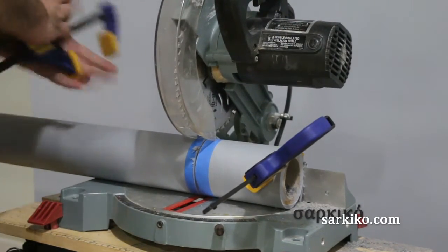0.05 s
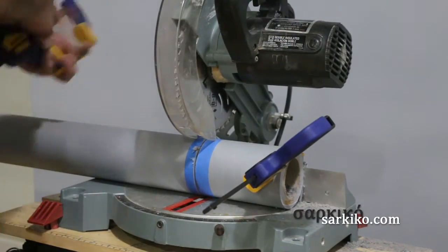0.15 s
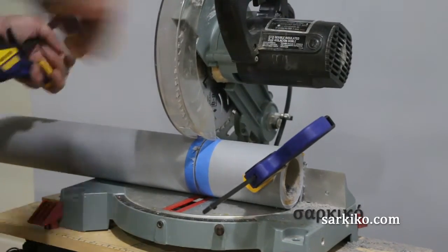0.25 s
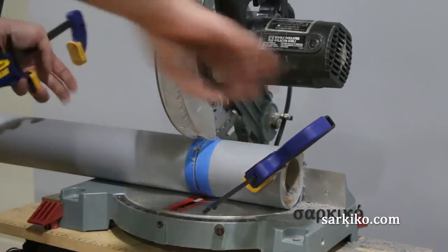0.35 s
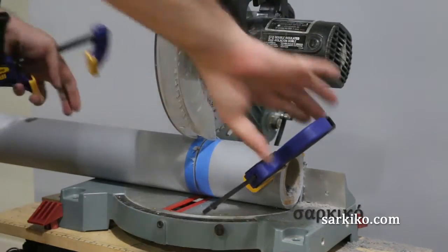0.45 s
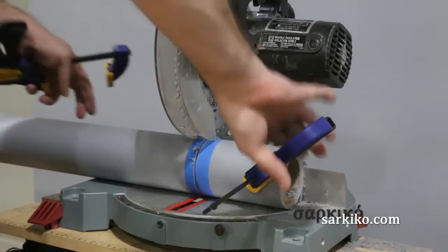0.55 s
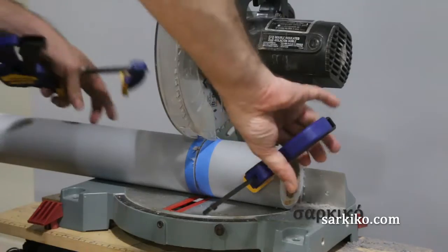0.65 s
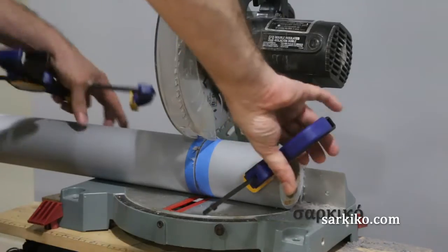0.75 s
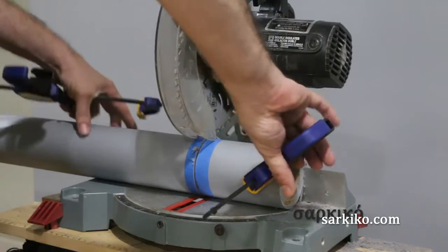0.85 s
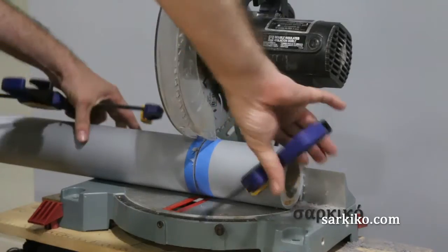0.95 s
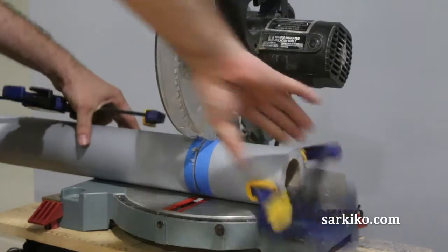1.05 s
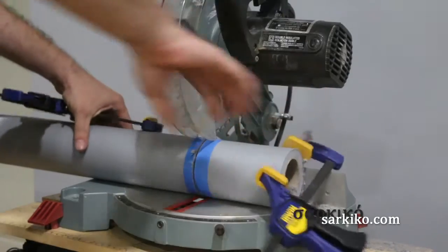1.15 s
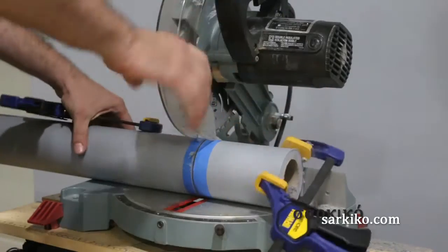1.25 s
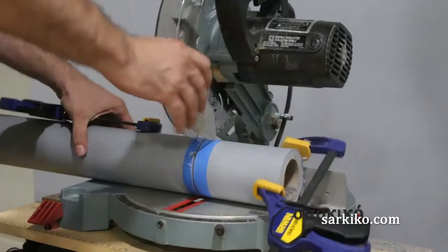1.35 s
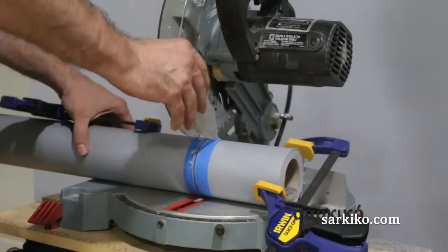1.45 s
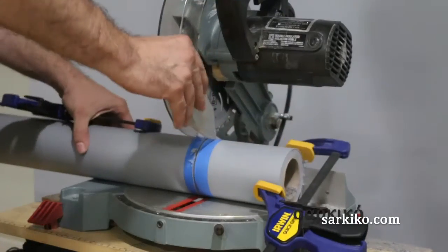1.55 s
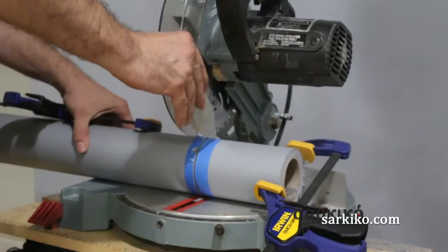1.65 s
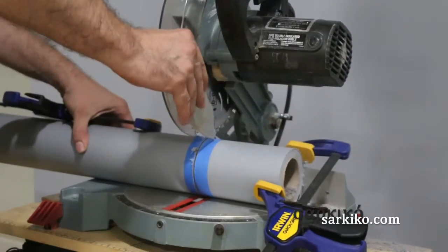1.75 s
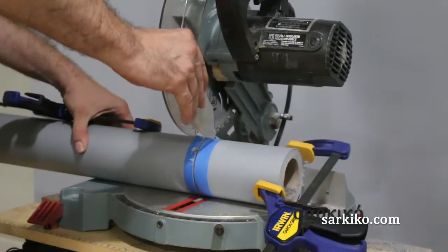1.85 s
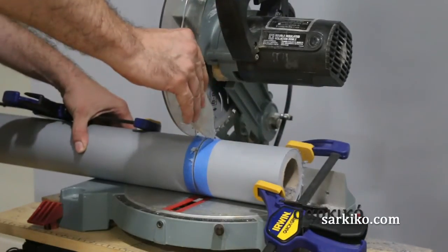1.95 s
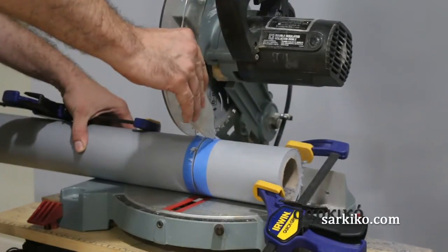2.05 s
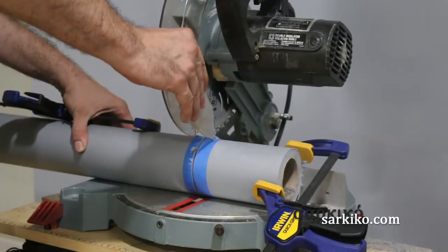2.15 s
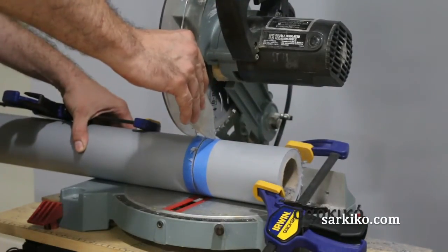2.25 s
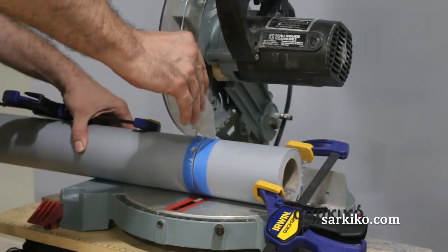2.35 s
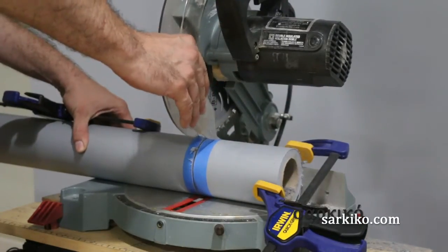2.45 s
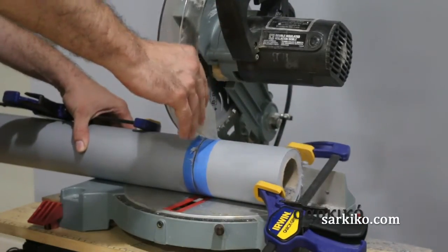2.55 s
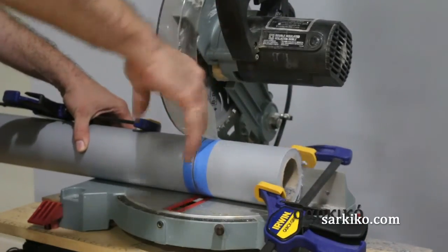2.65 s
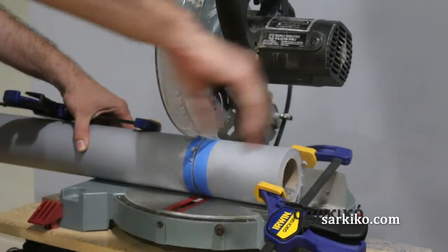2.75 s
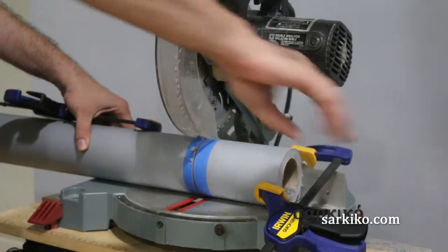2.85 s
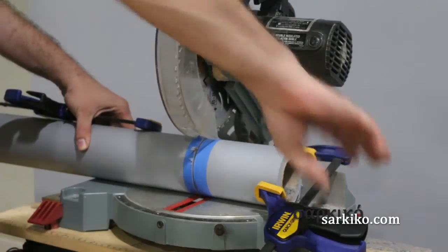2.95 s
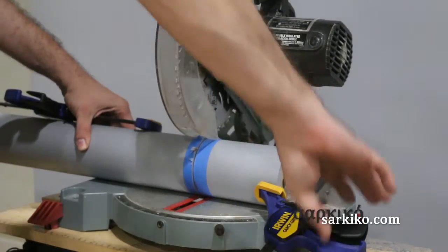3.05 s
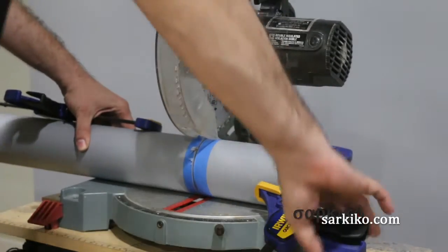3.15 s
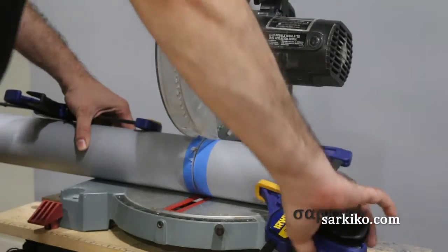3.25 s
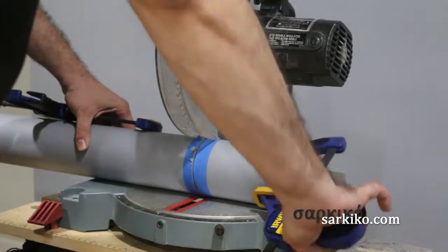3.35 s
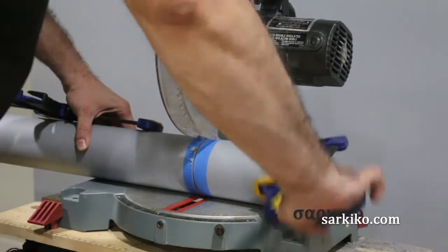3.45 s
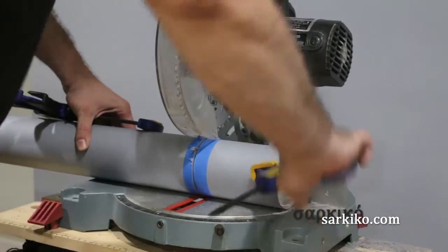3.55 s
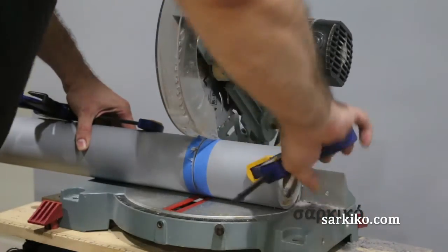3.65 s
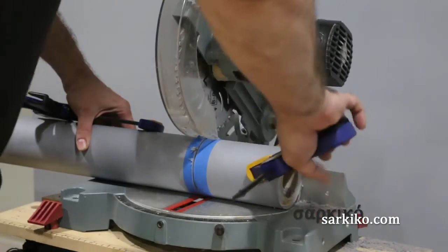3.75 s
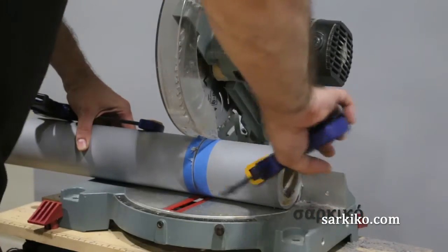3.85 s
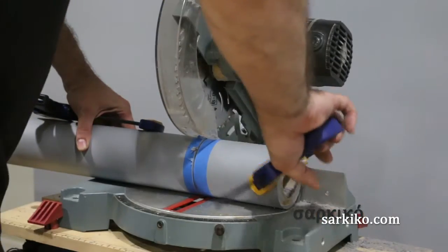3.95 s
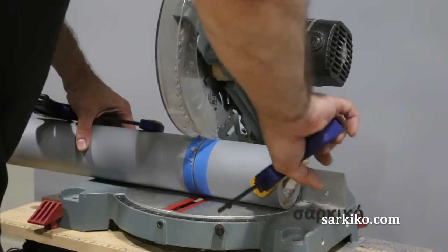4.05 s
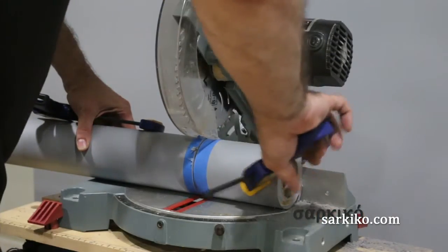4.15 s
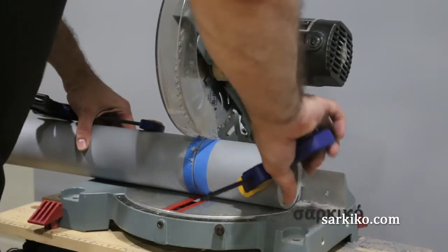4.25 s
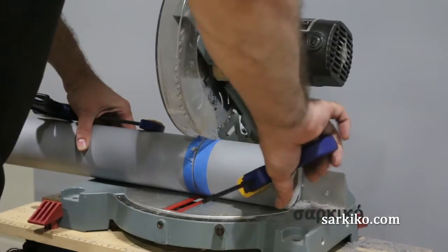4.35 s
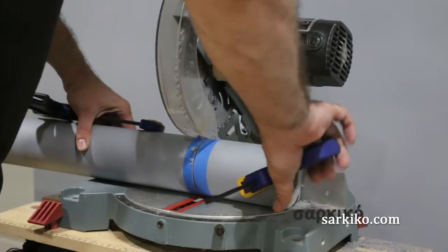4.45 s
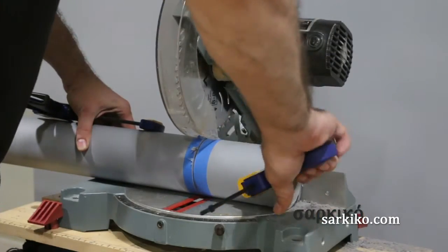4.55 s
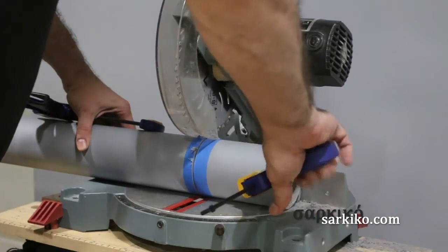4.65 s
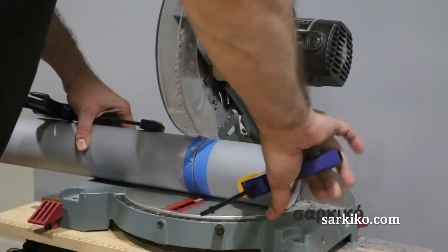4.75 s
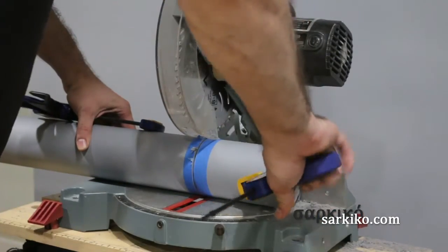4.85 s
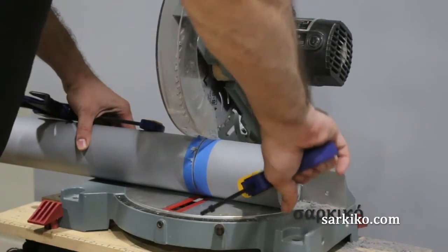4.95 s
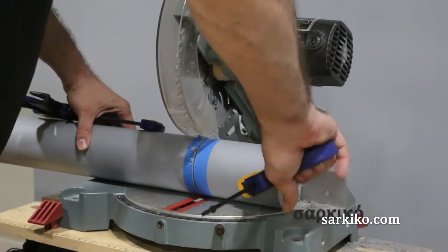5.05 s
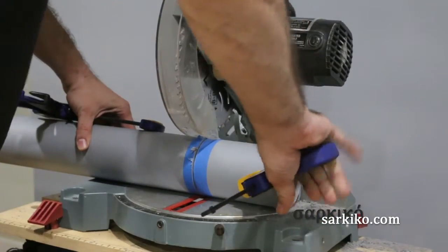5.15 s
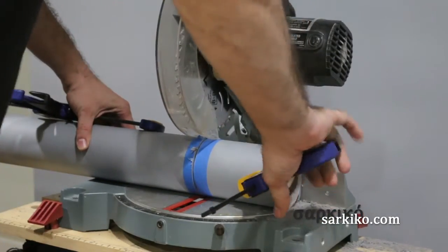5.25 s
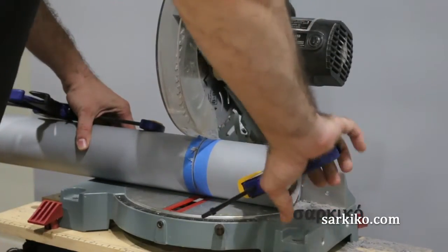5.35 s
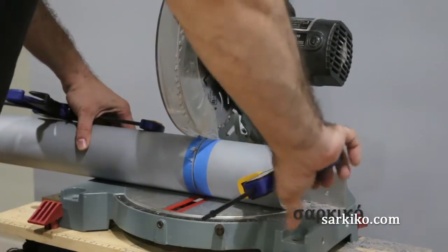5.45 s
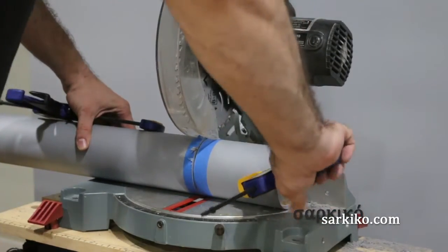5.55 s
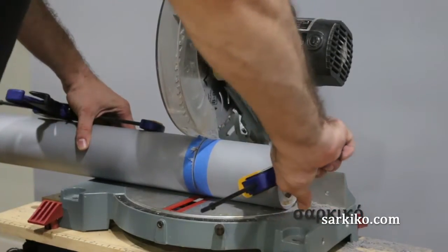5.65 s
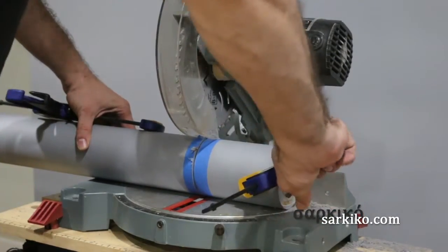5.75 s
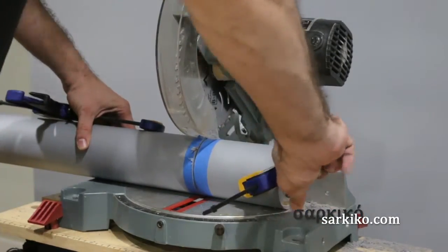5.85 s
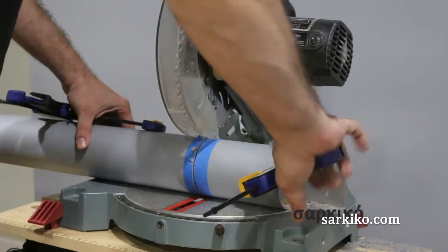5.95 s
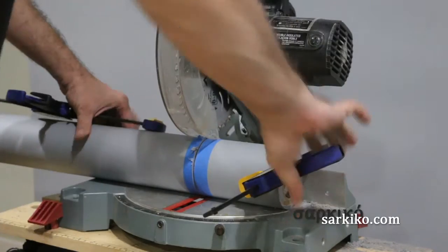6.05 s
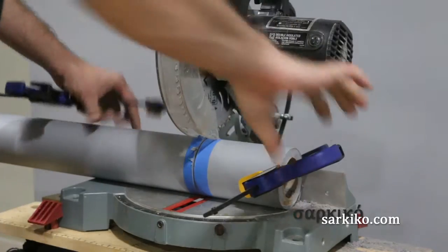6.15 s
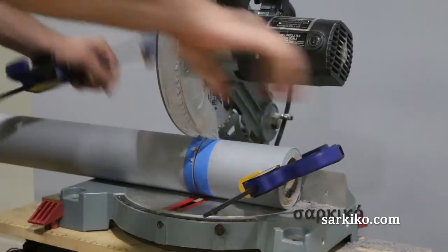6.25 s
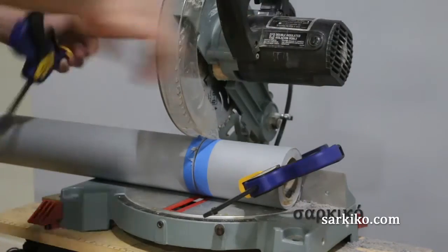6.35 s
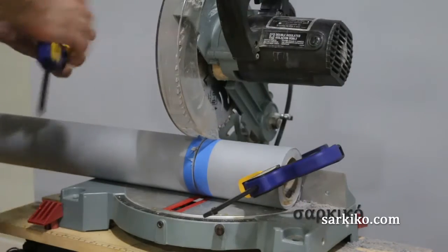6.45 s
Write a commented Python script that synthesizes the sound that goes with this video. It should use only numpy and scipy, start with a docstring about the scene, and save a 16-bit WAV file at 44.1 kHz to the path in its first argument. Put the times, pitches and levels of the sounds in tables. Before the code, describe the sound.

Close microphone in a small, lively workshop. A second clamp rattles faintly while hands rub, then a plastic clamp knocks a pipe and lands one very loud, sharp clack with a skittering bounce. After a quiet pause with tiny taps, the clamp is handled again: knocks, dry trigger clicks, one strong snap, and grainy rubbing over faint room hiss.

```python
"""In a small workshop a plastic bar clamp is set on a pipe at an idle mitre saw and squeezed tight.
Its jaws knock on pipe and fence, its trigger clicks, and a second clamp rattles in the other hand:
short bursts of contact noise excite the resonances of each part. Hands and pads rub and squeak as
filtered noise, and the saw blade rings as decaying sines. Room reverberation and steady noise surround
them; the loudest blows duck an automatic gain control and overload it."""
import sys
import numpy as np
from scipy import signal
from scipy.fft import rfft, irfft
from scipy.io import wavfile

SR = 44100
rng = np.random.default_rng(int(sys.argv[2]) if len(sys.argv) > 2 else 0)


def unload_audio(sound):
    """Save the sound as a 16-bit wav file, at the path given as the first command line argument."""
    columns = np.transpose(np.atleast_2d(sound))
    # keep every value between -1 and 1, then stretch to whole-number steps
    steps = np.round(np.clip(columns, -1, 1) * 32767)
    wavfile.write(sys.argv[1], SR, steps.astype(np.int16))


N = 285971
CUTOFF_HZ = 16000  # where the treble ends


def from_db(db):
    """Level law: decibels to amplitude gain."""
    return 10 ** (np.asarray(db) / 20)


def unit(x):
    """Energy normalisation: scale to a sum of squares of one."""
    return x / np.sqrt(np.sum(x ** 2) + 1e-20)


def at_hz(points, hz):
    """Logarithmic pitch scale: interpolate a table over log frequency."""
    freqs, values = np.transpose(points)
    return np.interp(np.log(hz + 1e-9), np.log(freqs), values)


def band(x, low_hz, high_hz, order=2):
    """Band limitation: causal Butterworth band-pass."""
    edges = np.clip([low_hz, high_hz], [10, 20], [.44 * SR, .45 * SR])
    return signal.sosfilt(signal.butter(order, edges, "band", fs=SR, output="sos"), x)


def resonate(x, hz, width_hz):
    """Damped resonance: a two-pole filter with a gain of one at its top."""
    r = np.exp(-np.pi * width_hz / SR)
    feed = np.array([1, 0, -1]) * (1 - r * r) / 2
    feedback = [1, -2 * r * np.cos(2 * np.pi * hz / SR), r * r]
    return signal.lfilter(feed, feedback, x)


def add(track, s, sound):
    """Superposition: mix a sound in at a time in seconds."""
    start = round(s * SR)
    track[start:start + len(sound)] += sound[:N - start]


def chatter(t, decay_s, seat_share=0.088):
    """Multiple micro-impact: tiny contacts with an even spectrum build as the parts seat, then die."""
    age = t / decay_s
    fade = np.exp(-age) * (1 - np.exp(-age / seat_share))
    burst = rng.standard_normal(len(t)) * fade
    # keep the phases, make every magnitude equal
    even = irfft(np.exp(1j * np.angle(rfft(burst))), len(t))
    return unit(even * np.sqrt(fade))


# a firmer blow is over sooner: each dB of level shortens its contact by this many dB
SHORTEN_DB_PER_DB = 0.35


def blows(rows, modes, body_db, body_follows, contact_s, thud_s, thud_hz, top_hz, vary_db):
    """Impact excitation: brief contact noise drives the modes; weight sets the thud, force the duration."""
    out = np.zeros(N)
    t = np.arange(SR // 5) / SR
    for s, level_db, weight_db, edge_db, bite_hz in rows:
        decay_s = contact_s * from_db(-SHORTEN_DB_PER_DB * level_db)
        contact = chatter(t, decay_s)
        push = chatter(t, thud_s)  # the heavy parts give way on their own time scale
        both = np.array([contact, push])
        ringing = both
        spot_db = vary_db * rng.standard_normal(len(modes))  # each spot favours other resonances
        for (hz, width_hz, db), spot in zip(modes, spot_db):
            ringing = ringing + from_db(db + spot) * resonate(both, hz, width_hz)
        shell, mass = ringing

        reach_hz = min(top_hz * from_db(0.92 * edge_db), CUTOFF_HZ)  # harder contacts reach higher
        hard = signal.sosfilt(signal.butter(2, reach_hz, fs=SR, output="sos"), shell)
        bite = unit(band(shell, bite_hz / 1.584, bite_hz * 1.237))
        thud = from_db(weight_db) * unit(band(mass, 80, thud_hz))
        hollow = from_db(body_db + body_follows * weight_db) * unit(band(shell, 470, 1400))
        edge = from_db(edge_db) * unit(band(hard, 3600, 18000))
        # hollow body and sharp edge enter with opposite polarity
        add(out, s, from_db(level_db) * (bite + thud - hollow - edge))
    return out


# The jaws bump against pipe and fence. Each row: start in seconds, level in dB, weight behind the
# blow in dB relative to its bite, sharp edge in dB relative to its bite, nominal bite frequency in Hz.
JAW_KNOCKS = [(0.792, -2.5, -1, -9.5, 2180), (0.8196, -3.5, -15, -7.5, 2940), (1.1048, 19, -21, -3, 2690),
              (1.1127, 11, -12, -11, 2100), (1.2145, 4, -24, -8, 2450), (1.462, -12.5, -20, -9, 2400),
              (1.594, -35.5, 13.5, 3, 2190), (2.432, -27, -13, -8, 2120), (2.495, -23, 0, -6, 2020),
              (2.656, -24.5, 11, -19, 1600), (3.229, -22.5, -17, -10, 1910), (3.684, -7, 0.5, -12, 2220),
              (3.928, -18.5, 7, -3, 2630), (3.934, -7.5, 5, -8.5, 2270), (4.496, -16, 2, -16, 2230),
              (5.846, -21, 1, -14, 1750), (5.867, -24.5, 2, -11, 1750)]
# Resonances of the jaws. Each row: frequency in Hz, width in Hz, nominal gain in dB.
JAW_MODES = [(274, 80, 8), (469.6, 110, 3.5), (731.4, 120, 8), (989, 150, 9), (1284, 100, 3.5),
             (1406, 63, 6.5), (1630, 130, 8.5), (2016, 240, 4), (2450, 87, 7), (2696, 140, 10.5),
             (3330, 280, 8), (4400, 1400, 2), (9700, 3200, -4)]


def jaw_knocks():
    """Impact of a massive body: the jaws knock with a low thud, and skitter after the hardest knock."""
    return blows(JAW_KNOCKS + skitter(count=5), JAW_MODES, body_db=-5.0, body_follows=-0.11,
                 contact_s=0.0067, thud_s=0.016, thud_hz=521, top_hz=18950, vary_db=2.1)


def hardest_knock():
    """Peak excitation: start in seconds and level in dB of the strongest jaw knock."""
    s, level_db, *_ = max(JAW_KNOCKS, key=lambda knock: knock[1])
    return s, level_db


SKITTER_AFTER_S, SKITTER_GAP_S, SKITTER_DB = .05, 0.01, -19.5  # level relative to the hardest knock
SKITTER_WEIGHT_DB, SKITTER_EDGE_DB, SKITTER_HZ = -24, -21.5, 2100


def skitter(count):
    """Repeated rebound: uneven light bounces of the clamp on the saw table follow the hardest knock."""
    s, level_db = hardest_knock()
    bounces = []
    for k, (late, firm) in enumerate(rng.uniform(-1.03, 1, (count, 2))):
        start_s = s + SKITTER_AFTER_S + SKITTER_GAP_S * (k + .3 * late)
        bounce_db = level_db + SKITTER_DB + 2 * firm
        bounces.append((start_s, bounce_db, SKITTER_WEIGHT_DB, SKITTER_EDGE_DB, SKITTER_HZ))
    return bounces


# The trigger and its locking plate catch on the bar. Each row: start in seconds, level in dB, weight
# in dB relative to the bite, sharp edge in dB relative to the bite, nominal bite frequency in Hz.
TRIGGER_CLICKS = [(1.408, -4.5, -15, -9, 2620), (1.4127, -1, -20, -15, 2470),
                  (3.301, -17.5, -11, -15, 2200), (3.325, -14, -10.5, -8.5, 2900),
                  (3.6116, -6, -12, -12, 2100), (4.2826, -16, -11.5, -10.5, 3070),
                  (4.3457, 13, -19.5, -0.5, 2170), (4.533, -13, -9, -10, 4000),
                  (4.747, -11.5, -8.5, -6, 3460), (4.832, -4.5, -13, -35, 3370),
                  (4.8454, -3.5, -11, -6, 2420), (5.16, -20, -27, -9.5, 3020),
                  (5.1962, -9.5, -8, -6.5, 2920), (5.4647, -7.5, -22.5, -39, 3120),
                  (5.9534, -7, -12, -7.5, 3100)]
# Resonances of the trigger. Each row: frequency in Hz, width in Hz, nominal gain in dB.
TRIGGER_MODES = [(258, 73, 4.5), (489, 25, 5.5), (1090, 84, 11.5), (1786, 170, 14.5), (1947, 410, 10),
                 (2370, 300, 8), (2880, 88, -3), (3460, 2100, 6), (4550, 3300, 7), (5730, 600, -18),
                 (6700, 400, -12), (10200, 760, -1.5)]


def trigger_clicks():
    """Impact of a light latch: the trigger clicks and its plate rebounds."""
    return blows(TRIGGER_CLICKS + rebounds(), TRIGGER_MODES, body_db=-0.5, body_follows=1.0,
                 contact_s=0.0048, thud_s=.016, thud_hz=530, top_hz=13000, vary_db=1.6)


REBOUND_S, REBOUND_DB = 0.0048, -13.5  # delay and level relative to the click


def rebounds():
    """Inelastic rebound: the locking plate strikes once more, more weakly, after each click."""
    return [(s + REBOUND_S, db + REBOUND_DB, *colour) for s, db, *colour in TRIGGER_CLICKS]


# The loose clamp's jaw rattles on its bar. Each row: start in seconds, level in dB, weight in dB
# relative to the bite, sharp edge in dB relative to the bite, nominal bite frequency in Hz.
LOOSE_RATTLES = [(0.038, -26, -16, -17, 1700), (0.0715, -19.5, -2, -3.5, 3240),
                 (0.1366, -12.5, -25, -6, 2500), (0.481, -20, -1.5, -3.5, 2900),
                 (0.562, -23.5, -12, -26, 2000), (0.9375, -14.5, -16, -11.5, 2400),
                 (0.955, -17.5, 2, -4.5, 2400), (1.055, -21.5, -9.5, -7, 2200),
                 (1.076, -12.5, -14, -7.5, 2700), (2.6928, -25.5, -15, -22, 2700)]
# Resonances of the loose clamp. Each row: frequency in Hz, width in Hz, nominal gain in dB.
LOOSE_MODES = [(980, 17, 5.4), (2330, 94, 13.2), (2558, 100, 17), (2720, 170, 13), (3620, 230, 7),
               (4500, 1500, 3.1)]


def loose_rattles():
    """Impact across free play: the second clamp's jaw knocks lightly on its bar."""
    return blows(LOOSE_RATTLES, LOOSE_MODES, body_db=-1, body_follows=.3,
                 contact_s=0.005, thud_s=0.0065, thud_hz=500, top_hz=12000, vary_db=3.5)


def stick_slip(rows, octaves, grain_db, grains_per_s, rise, blur_hz=0, catch_db=1.5, catches_per_s=60):
    """Stick-slip friction: band-limited noise with a grainy, catching level swells quickly and fades."""
    out = np.zeros(N)
    for s, length_s, db, hz in rows:
        t = np.arange(int(length_s * SR)) / SR
        fine, coarse, hiss = rng.standard_normal((3, SR))
        grains = grain_db * np.interp(t * grains_per_s, np.arange(SR), fine)
        catches = catch_db * np.interp(t * catches_per_s, np.arange(SR), coarse)
        slips = hiss[:len(t)] * from_db(grains + catches)
        half = 2 ** (octaves / 2) + blur_hz / hz / 2  # frequency ratio from centre to band edge
        swell = np.sqrt(np.interp(t / t[-1], [0, rise, 1], [0, 1, 0]))
        rub = unit(band(slips, hz / half, hz * half) * swell)
        add(out, s, from_db(db) * np.sqrt(len(t)) * rub)
    return out


# Hands, pads and pipe slide, and the trigger's ratchet scrapes once (the 3.324 s row). Each row: start in #
# seconds, length in seconds, RMS level in dB before the sliding gain in scene(), centre in Hz.
SLIDES = [(0.484, 0.056, -48.5, 740), (0.618, 0.075, -42.5, 277), (0.92, 0.34, -52.5, 350),
          (1.16, 0.19, -41.5, 125), (1.404, 0.14, -42.5, 175), (2.491, 0.16, -55.5, 5600),
          (2.82, 0.25, -62, 200), (3.324, 0.037, -48, 2860), (3.33, 0.25, -48.5, 157),
          (3.372, 0.16, -49, 1020), (3.528, 0.05, -41.5, 740), (3.62, 0.084, -47, 230),
          (4.02, 0.12, -55, 96), (4.102, 0.15, -54.5, 4000), (4.171, 0.054, -48.5, 400),
          (4.726, 0.09, -41.5, 700), (5.001, 0.33, -54, 885), (5.61, 0.28, -52, 1050),
          (5.927, 0.048, -44, 2860)]


def slides():
    """Irregular friction: hands, pads and pipe, and once the trigger's ratchet, make broad bands of grainy
    noise."""
    return stick_slip(SLIDES + drags(), octaves=2.39, grain_db=4.5, grains_per_s=340, rise=.3)


DRAG_S, DRAG_DB, DRAG_HZ = 0.062, -25, 690  # level relative to click level plus weight


def drags():
    """Load-dependent friction: the bar drags the pad after each click, louder with more weight."""
    return [(s, DRAG_S, db + weight_db + DRAG_DB, DRAG_HZ) for s, db, weight_db, *_ in TRIGGER_CLICKS]


# Even slides sing: high squeaks on the bar, low hums on pipe and blade. Each row: start in seconds,
# length in seconds, RMS level in dB before the sliding gain in scene(), centre in Hz.
SQUEAKS = [(0.144, 0.052, -43, 2500), (0.56, 0.05, -46.5, 2000), (0.94, 0.06, -57.5, 2450),
           (1.8, 0.26, -61.5, 500), (2.652, 0.037, -39, 510), (3.0, 0.43, -58, 434),
           (3.15, 0.05, -58.5, 3450), (5.95, 0.042, -39.5, 680)]


def squeaks():
    """Regular stick-slip: even sliding confines the noise to narrow bands, heard as squeaks and hums."""
    return stick_slip(SQUEAKS, octaves=0.08, grain_db=3, grains_per_s=480, rise=.2, blur_hz=200)


# The saw blade rings on after a knock. Each row: frequency in Hz, level in dB relative to the knock,
# 60 dB decay time in seconds.
BLADE_MODES = [(445, -75, 1.8), (459, -53, 1.16), (565, -58, 1.8), (1007, -68.5, 1.4), (1443, -71, 1.3)]


def blade():
    """Free modal decay: the hardest knock travels through the saw's frame and rings the steel blade."""
    out = np.zeros(N)
    t = np.arange(2 * SR) / SR
    s, level_db = hardest_knock()
    ring = np.zeros(len(t))
    for hz, db, t60 in BLADE_MODES:
        ring += from_db(level_db + db - 60 * t / t60) * np.sin(2 * np.pi * hz * t)
    add(out, s, ring)
    return out


# Decay of the workshop's reverberation. Each row: frequency in Hz, 60 dB decay time in seconds.
ROOM_T60 = [(100, 0.51), (400, 0.37), (1500, 0.4941), (3000, 0.308), (7000, 0.53), (15000, 0.3)]
# Colour of the reverberation. Each row: frequency in Hz, relative band gain in dB.
ROOM_DB = [(100, 2.9), (400, 2.2), (1500, -0.67), (3000, 0.83), (7000, -3.9), (15000, -5.3)]


def workshop(x, wet_db, near_db, near_s, gap_s):
    """Reverberation: quick reflections off saw and bench, and a diffuse tail with decay set by band."""
    t = np.arange(SR) / SR
    white = rng.standard_normal((2, SR))
    tail = np.zeros(SR)
    edges = np.geomspace(50, 18000, 13)
    for k, (low, high) in enumerate(zip(edges, edges[1:])):
        hz = np.sqrt(low * high)
        decay_db = at_hz(ROOM_DB, hz) - 60 * t / at_hz(ROOM_T60, hz)
        tail += band(white[k % 2], low, high) * from_db(decay_db)  # neighbours use different noise
    tail = unit(tail * (1 - np.exp(-(t / gap_s) ** 2)))
    near = chatter(t, near_s, seat_share=1.2)
    response = from_db(wet_db) * tail + from_db(near_db) * near
    return x + signal.fftconvolve(x, response)[:N]


# Spectrum of the steady room noise. Each row: frequency in Hz, relative density in dB per Hz.
AIR_SPECTRUM = [(15, -35.5), (25, -7), (58, -1.5), (263, -7), (416, -7.5), (516, -8), (560, -10),
                (936, -13), (2110, -17), (9840, -25), (16000, -34)]
AIR_DB = -55  # RMS level before gain control and filters


def air():
    """Stationary noise: the still room and the microphone's hiss, shaped in frequency."""
    spectrum = rfft(rng.standard_normal(N))
    noise = irfft(spectrum * from_db(at_hz(AIR_SPECTRUM, np.fft.rfftfreq(N, 1 / SR))), N)
    return from_db(AIR_DB) * np.sqrt(N) * unit(noise)


def scene():
    """Superposition: clamp sounds in the room, the blade's faint ring and the steady noise."""
    impacts = jaw_knocks() + trigger_clicks() + loose_rattles()
    sliding = from_db(-5.5) * (slides() + squeaks())
    room = workshop(impacts + sliding, wet_db=-4.5, near_db=-4.5, near_s=0.0072, gap_s=0.0048)
    return (room + blade() + air())[None]


def gain_control(x, threshold_db, slope, attack_s, release_db_per_s):
    """Dynamic compression: gain ducks within milliseconds of a loud blow and recovers steadily in dB."""
    t = np.arange(N) / SR
    r = np.exp(-1 / (attack_s * SR))
    power = signal.lfilter([1 - r], [1, -r], x ** 2)
    level_db = 10 * np.log10(power + 1e-12)
    excess_db = np.maximum(level_db - threshold_db, 0) * slope
    # a running maximum against a rising ramp makes the reduction fall at the release rate
    release_db = release_db_per_s * t
    held_db = np.maximum.accumulate(excess_db + release_db, axis=-1) - release_db
    return x * from_db(-signal.lfilter([1 - r], [1, -r], held_db))


def record(dry):
    """Limited transmission: gain control, overload on the peaks, a gentle low cut, a steep top cut."""
    ducked = gain_control(dry, threshold_db=-15.5, slope=0.78, attack_s=0.0058, release_db_per_s=88.5)
    overloaded = np.clip(ducked, -1, 1)
    low_cut = signal.butter(2, 40, "high", fs=SR, output="sos")
    top_cut = signal.ellip(12, .1, 90, CUTOFF_HZ, fs=SR, output="sos")
    return signal.sosfilt(np.vstack([low_cut, top_cut]), overloaded)


dry = scene()
out = record(dry)
unload_audio(out)
```